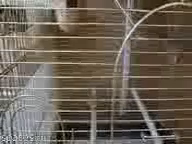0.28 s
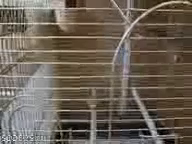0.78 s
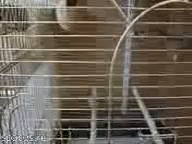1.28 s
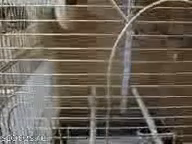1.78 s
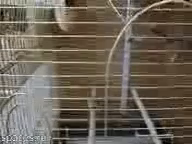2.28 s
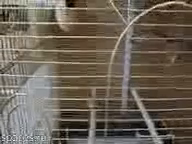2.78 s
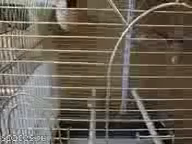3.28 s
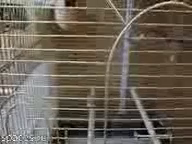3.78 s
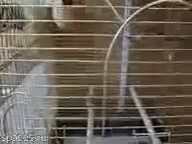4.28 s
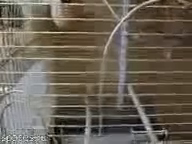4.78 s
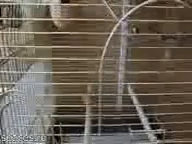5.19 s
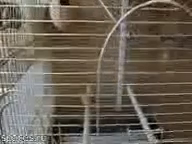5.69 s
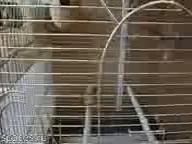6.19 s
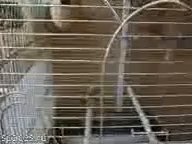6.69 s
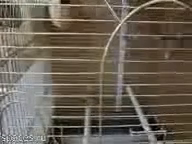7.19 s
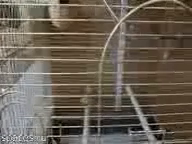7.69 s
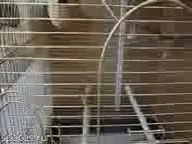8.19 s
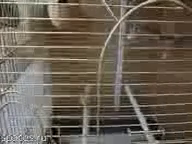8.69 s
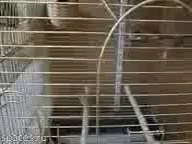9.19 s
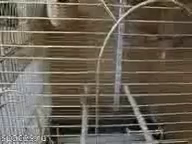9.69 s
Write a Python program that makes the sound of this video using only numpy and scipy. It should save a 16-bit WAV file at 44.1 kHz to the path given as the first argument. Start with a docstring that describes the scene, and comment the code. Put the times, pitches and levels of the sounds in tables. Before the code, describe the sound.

Close, mono, slightly band-limited sound of small cage birds indoors. High peeps with a raspy edge come singly, with little nasal notes and a few hoarse slurs between them. The calls crowd into fast buzzy chatter at the middle, then thin out. Wire rings faintly, feathers rustle and wings thump the air, followed by scattered peeps. A deep unsteady hum and faint air hiss run throughout.

```python
"""In a small room, zebra finches in a wire cage give rising whistles, soft nasal calls and a burst of song.
Each bird has two voices: a sine whistle that glides, and a reed of harmonics mixed with pulsed air.
Shaped noise makes the low hum, drone and room air; a distant engine of two harmonics swells and fades.
A bird flutters from perch to perch: ringing wire, grainy rustle, and puffs of air at the microphone.
"""
import sys
import numpy as np
from scipy import signal
from scipy.fft import rfft, irfft, next_fast_len
from scipy.io import wavfile
from scipy.ndimage import uniform_filter1d, map_coordinates

SR = 44100
rng = np.random.default_rng(int(sys.argv[2]) if len(sys.argv) > 2 else 0)


def generate_wav(sig):
    """Save sig (samples, or channels by samples) to the path in sys.argv[1] as 16-bit PCM at SR."""
    pcm = np.round(np.clip(np.atleast_2d(sig).T, -1, 1) * 32767).astype(np.int16)
    wavfile.write(sys.argv[1], SR, pcm)


N = 437031  # samples in the scene


def amp(db):
    """Decibels to gain."""
    return 10 ** (np.asarray(db) / 20)


def unit(x):
    """Scale to rms 1."""
    return x / np.sqrt(np.mean(x ** 2) + 1e-20)


def along(points, hz):
    """Read (frequency, value) points on a log frequency axis."""
    f, v = np.transpose(points)
    return np.interp(np.log(hz + 1e-9), np.log(f), v)


def curves(rows, t):
    """Each column after the first, read at t."""
    s, *cols = np.transpose(rows)
    return [np.interp(t, s, c) for c in cols]


def clock(length):
    """Sample times over a length in seconds."""
    return np.arange(int(length * SR)) / SR


def wobble(rate, size):
    """A smooth random curve with rate knots a second."""
    knots = rng.standard_normal(int(size * rate / SR) + 4)
    return map_coordinates(knots, [np.arange(size) * rate / SR])


def filtered(x, response):
    """Apply a gain that depends on frequency."""
    m = next_fast_len(2 * len(x))
    gain = response(np.fft.rfftfreq(m, 1 / SR))
    return irfft(rfft(x, m) * gain, m)[:len(x)]


def noise(colour, size, scale=1):
    """Noise of rms 1 with a spectrum, shifted in frequency by scale."""
    white = rng.standard_normal(size)
    return unit(filtered(white, lambda hz: amp(along(colour, hz / scale))))


def cycles(hz):
    """The phase of a moving pitch."""
    return 2 * np.pi * np.cumsum(hz) / SR


def add(track, s, x):
    """Mix x into the track at s seconds."""
    part = track[max(round(s * SR), 0):][:len(x)]
    part += x[:len(part)]


# decay of the small room: [f/Hz, t60/s]
ROOM_DECAY = [(300, 0.23), (2000, 0.3), (4200, 0.25), (7000, 0.2)]


def in_room(x, room_db, bars_db=-11, gap=0.0033):
    """A sound with quick echoes in the cage and a room tail, drawn anew each time; gap in s slows its onset."""
    hz, t, z = signal.stft(rng.standard_normal(SR // 2), SR, nperseg=256)
    decay = amp(-60 * t / along(ROOM_DECAY, hz)[:, None])  # high and low bands die at their own rates
    tail = signal.istft(z * decay, SR, nperseg=256)[1]
    tail *= 1 - np.exp(-np.arange(len(tail)) / SR / gap)
    echo = amp(room_db) * tail / np.linalg.norm(tail)
    delays = rng.uniform(.001, .012, size=6)  # s
    bars = amp(bars_db) * rng.choice([-1, 1], size=6) / np.sqrt(len(delays))
    echo[(delays * SR).astype(int)] += bars
    echo[0] += 1  # the direct sound
    return signal.fftconvolve(x, echo)


def reed(pitch, throat, scale, rough, jitter=0.024):
    """Harmonics of the syrinx through a throat, mixed with air that puffs once a cycle."""
    size, rough = len(pitch), np.clip(rough, 0, 1)
    phase = cycles(pitch * (1 + jitter * rough * wobble(500, size)))
    k = np.arange(1, 15)[:, None]  # harmonic numbers
    partial_hz = k * pitch
    gains = amp(along(throat, partial_hz / scale)) * (partial_hz < SR / 4)
    tone = np.sum(gains * np.sin(k * phase + rng.uniform(0, np.pi, k.shape)), axis=0)
    air = unit(noise(throat, size, np.mean(scale)) * (1 + np.cos(phase)))
    return np.sqrt(1 - rough) * unit(tone) + np.sqrt(rough) * air


def swell(u, rise, fall):
    """The push of air behind a note, rms 1; rise and fall are shares of its length."""
    ramp = np.clip(np.minimum(u / rise, (1 - u) / fall), 0, 1)
    return unit(np.sin(np.pi / 2 * ramp) ** 2)


# low hum filling the room, before hum_db: [t/s, level/dB]
HUM_LEVEL = [(0, -42.5), (0.25, -38.5), (0.85, -46), (1.6, -41.0), (2.25, -36), (2.75, -39.5), (3.4, -37),
             (4.0, -41.5), (4.6, -43), (5.0, -41.5), (5.6, -47), (6.1, -45.9), (6.45, -38.5), (6.85, -38),
             (7.2, -42.5), (8.0, -39), (9.0, -41), (9.9, -43.5)]
# its spectrum: [f/Hz, relative level/dB]
HUM_COLOUR = [(20, -22.5), (30, -12.5), (42, -16.5), (52, -2.5), (60, 3), (67, -3), (76, -12.5),
              (90, -21.5), (110, -32), (150, -53.5), (250, -76)]


def hum(hum_db=0.5, steady=0.38):
    """A wavering low hum: narrow noise whose slow beats are partly evened out."""
    rumble = noise(HUM_COLOUR, N)
    beats = uniform_filter1d(np.abs(signal.hilbert(rumble)), SR // 20)
    rumble = unit(rumble / (beats + .01) ** steady)
    return amp(curves(HUM_LEVEL, np.arange(N) / SR)[0] + hum_db) * rumble


# spectrum of the room air: [f/Hz, relative level/dB]
AIR_COLOUR = [(60, 7), (110, 4.5), (140, 3.5), (200, 0.5), (270, -2), (400, -4.5), (700, -8), (1200, -9.5),
              (2000, -14), (4000, -17), (5500, -18), (6800, -29), (7500, -53.5)]


def room_air(air_db=-54):
    """Nearly even broadband air noise."""
    return amp(air_db + 0.7 * wobble(2.6, N)) * noise(AIR_COLOUR, N)


# upper drone, before gain_db: [t/s, level/dB]
DRONE_LEVEL = [(0, -57), (0.2, -64), (0.45, -53), (1.0, -56.5), (1.8, -55.4), (2.2, -63), (2.85, -58.5),
               (3.6, -60.5), (4.25, -56.5), (4.6, -65.5), (5.4, -59.9), (6.3, -60), (7.3, -59.5),
               (7.95, -60), (8.45, -51.5), (9.2, -55.7), (9.9, -54.5)]
# its spectrum: [f/Hz, relative level/dB]
DRONE_COLOUR = [(90, -48), (140, -17.5), (160, 1.5), (168, 2.5), (180, -6.5), (200, -18.5), (300, -44.5),
                (600, -89.5)]


def drone(gain_db=-1):
    """A narrow band of noise above the hum, wavering in level."""
    return amp(curves(DRONE_LEVEL, np.arange(N) / SR)[0] + gain_db) * noise(DRONE_COLOUR, N)


# distant engine, before its random wander: [t/s, firing f/Hz, level/dB]
ENGINE_RUN = [(.1, 75.46, -60), (.35, 81.5, -46), (.8, 93.3, -54), (1.05, 110.7, -56), (1.25, 125.7, -47),
              (1.5, 138, -50.5), (1.82, 129, -41.8), (1.96, 122.1, -45), (2.16, 116.2, -83)]


def engine(octave_db=-19):
    """A far engine that revs and eases off: its firing tone and the octave above."""
    firing, db = curves(ENGINE_RUN, np.arange(N) / SR)
    phase = cycles(firing * (1 + 0.005 * wobble(13, N)))
    tone = unit(np.sin(phase) + amp(octave_db) * np.sin(2 * phase))
    return amp(db + 2.5 * wobble(5.5, N)) * tone


# resonances over the rasping side of the syrinx, before a slight scaling: [f/Hz, gain/dB]
RASP_THROAT = [(400, -29.5), (850, 2.5), (1100, -2), (1600, -8.5), (2250, -1), (2700, 1), (3300, 11.5),
               (4700, -1.5), (5400, 0), (6400, 1), (7500, -16)]


def chirps(calls, shape, gain_db, rasp_gain_db, room_db, waver, rough, lowest_hz,
           rasp_hz=570, flutter_db=2.0, follow=0.55):
    """One side of the syrinx whistles a gesture floored at lowest_hz before its waver; the other rasps."""
    track = np.zeros(N)
    lead = .3  # a faint lead-in, as a share of the length, before the call proper
    for s, length, hz, db, accent_db, rasp_db in calls:
        u = clock(length * (1 + lead)) / length - lead
        ratio, push_db = curves(shape, u)
        gate = swell((u + lead) / (1 + lead), .2, .06)
        # the whistle frays most towards its end
        fray = waver * (.25 + u ** 2) * wobble(1496, len(u))
        pitch = np.maximum(hz * ratio, lowest_hz) * (1 + fray)
        whistle_db = push_db + accent_db * u + flutter_db * wobble(359, len(u))
        whistle = unit(gate * amp(whistle_db) * np.sin(cycles(pitch)))
        # the rasp follows only part of the whistle's gesture
        reed_voice = reed(rasp_hz * np.sqrt(ratio), RASP_THROAT, 0.99, rough)
        rasp = unit(gate * amp(follow * push_db) * reed_voice)
        call = amp(db + gain_db) * (whistle + amp(rasp_db + rasp_gain_db) * rasp)
        add(track, s - lead * length, in_room(call, room_db))
    return track


# rising contact calls, before gains and gesture:
# [t/s, length/s, f/Hz, level/dB, accent from start to end/dB, rasp re whistle/dB]
CONTACT_CALLS = [(.254, .036, 4030, -26.5, 3, -17.5), (1.0, 0.037, 4073, -26, -3, -14.5),
                 (1.333, 0.037, 3740, -34, 12, -5), (2.029, 0.035, 4095, -21, 1, -17),
                 (3.282, 0.034, 4095, -27.5, -1, -10), (5.052, 0.036, 3950, -26, 8, -17),
                 (5.343, 0.038, 3734, -30.5, 17, -10), (5.481, 0.04, 4060, -26, 4, -12.5),
                 (6.202, 0.039, 4100, -20, -5.5, -16), (6.714, .038, 3650, -28, 8, -9.5),
                 (7.167, 0.04, 3570, -32.5, -4, -9), (7.409, .041, 4040, -24.5, -12, -18.5),
                 (7.505, .037, 3960, -34, -1, -3), (7.56, 0.046, 3490, -33.5, -2.5, -8),
                 (7.829, 0.036, 4006, -29, 2, -13.5), (8.421, 0.039, 3604, -33, -3, -7),
                 (8.892, 0.044, 3675, -34, -3, -10), (9.182, .032, 3903, -36, -9, -6),
                 (9.433, 0.04, 3974, -32.5, 5, -6.5)]
# their shared gesture: [t/share of length, f/ratio, level/dB]
CONTACT_GESTURE = [(-.3, .78, -55), (0, .83, -20.5), (0.251, .937, 1.5), (.35, .98, -5), (.66, 1.005, -4),
                   (.73, 1.15, -8.5), (.86, 1.205, -10), (1, 1.22, -23.5)]


def contact_calls():
    """Short whistles that sweep upwards over a rasp."""
    return chirps(CONTACT_CALLS, CONTACT_GESTURE, gain_db=-2.28, rasp_gain_db=0.5, room_db=-8.0,
                  waver=0.048, rough=0.62, lowest_hz=3250, follow=.58)


# short arched chips, before gains and gesture:
# [t/s, length/s, f/Hz, level/dB, accent from start to end/dB, rasp re whistle/dB]
CHIP_CALLS = [(.581, .023, 3930, -21.5, -1.5, -13.5), (1.67, 0.022, 4010, -15.5, -7.5, -15),
              (2.261, 0.022, 3905, -22.5, -3, -13), (3.754, .023, 3994, -25.5, -4, -10),
              (5.889, 0.027, 4085, -18.5, -4, -10.5)]
# their shared gesture: [t/share of length, f/ratio, level/dB]
CHIP_GESTURE = [(-.3, 0.43, -52.5), (0, .72, -26), (.35, 0.89, -11.5), (.5, 1.07, 1), (.61, 1.13, -9),
                (.86, 1.17, -3), (1, 0.85, -7.5)]


def chips():
    """Short whistles that arch up and drop, over a mostly airy rasp."""
    return chirps(CHIP_CALLS, CHIP_GESTURE, gain_db=-4.5, rasp_gain_db=0.5, room_db=-7,
                  waver=0.041, rough=0.88, lowest_hz=2916)


# falling nasal notes, starting pitch, level before gain_db, hoarseness before it is scaled for the reed:
# [t/s, length/s, f/Hz, level/dB, roughness/0-1]
NASAL_NOTES = [(0.982, 0.049, 771, -42, 0.22), (1.399, 0.042, 763, -38.5, 0.2),
               (1.972, .036, 749, -42.5, 0.03), (2.351, 0.043, 767, -38, 0.19),
               (2.637, 0.046, 754, -42, 0.12), (2.873, 0.045, 772, -38.5, 0.21),
               (3.819, 0.042, 765, -38.5, .17), (4.053, 0.044, 769, -38.5, 0.22),
               (4.161, 0.044, 769, -38.5, 0.13), (4.274, 0.047, 764, -38.5, 0.16),
               (4.819, 0.045, 761, -37.5, 0.08), (5.213, 0.049, 740, -42.5, .35),
               (5.327, .041, 709, -40, .45), (5.511, 0.037, 760, -39.5, 0.52),
               (5.605, 0.032, 963, -31, .05), (5.631, 0.033, 888, -39, 0.47),
               (5.758, 0.035, 761, -40, 0.68), (5.856, 0.03, 960, -31, 0.09)]
# the throat around its moving resonance: [f/ratio to resonance, gain/dB]
NASAL_THROAT = [(.12, -30.5), (.2, -15), (.42, -4), (.6, -8.5), (0.799, -6), (1.01, 5), (1.22, -9),
                (1.45, -16), (1.9, -36.5)]
# share of pitch lost by a note's end, per second of its length; extra at full roughness
SAG_PER_S, HOARSE_SAG_PER_S = 1.53, 5.2
# the throat resonance starts near the fifth harmonic; its closing time
THROAT_RATIO, THROAT_CLOSE_S = 5.07, 0.076


def notes(gain_db=-2.0, room_db=-7):
    """Nasal notes: the pitch sags, more in long and hoarse ones, while the throat closes."""
    track = np.zeros(N)
    for s, length, hz, db, rough in NASAL_NOTES:
        t = clock(length)
        u = t / length
        fall = (SAG_PER_S + HOARSE_SAG_PER_S * rough) * length
        throat_hz = THROAT_RATIO * hz * np.exp(-(t / THROAT_CLOSE_S) ** 2)
        voice = reed(hz * (1 - fall * u ** 1.385), NASAL_THROAT, throat_hz, rough * 0.29)
        add(track, s, in_room(amp(db + gain_db) * swell(u, 0.49, 0.065) * voice, room_db))
    return track


# slurred calls, short and long, one table each, before waver, flutter and gain_db:
# [t/s, f/Hz, level/dB, overtones/dB]
SLURRED_CALLS = [
    [(1.828, 1400, -55.5, -6), (1.858, 1505, -46.5, -6), (1.878, 1677, -42, -27), (1.886, 2220, -41.5, -19),
     (1.896, 2286, -49, -18.5)],
    [(1.978, 2660, -56, -24), (1.987, 2585, -29, -25), (2.004, 2540, -26, -27), (2.013, 2192, -31, -30),
     (2.03, 2293, -40, -27), (2.04, 2353, -50, -27)],
    [(3.256, 1442, -64, 10), (3.274, 1465, -41, 5), (3.305, 1530, -42.5, 3), (3.313, 1605, -34, -9),
     (3.335, 1770, -30, -2.5), (3.368, 1930, -26, -7.5), (3.386, 2055, -24, -7), (3.39, 2980, -28, -21),
     (3.4, 2980, -28, 1.5), (3.414, 2850, -43, -7)],
    [(3.481, 1900, -55, -16.5), (3.486, 1670, -36.5, -16), (3.494, 1630, -54, -6)],
]
# gain over their overtones: [f/Hz, gain/dB]
SLUR_THROAT = [(2800, 5.5), (3400, -20), (4000, 2.5), (4600, -4.5), (5300, -1.5), (6100, -6), (6700, -24),
               (8000, -19.5)]
# resonances of the beak, colouring slur breath and, once scaled, the buzzes: [f/Hz, gain/dB]
BEAK_COLOUR = [(500, -15), (1100, -8.5), (1600, -12), (2200, -1), (3200, 3.5), (3800, 4.5), (4800, 2),
               (5600, -7), (7000, -31)]


def slurs(gain_db=-1.0, room_db=-4, waver=0.021, flutter_db=1.8, breath_db=-12.5):
    """Hoarse slurred calls, short and long: a gliding tone, overtones and breath; some leap in pitch."""
    track = np.zeros(N)
    for rows in SLURRED_CALLS:
        start = rows[0][0]
        pitch, db, over_db = curves(rows, start + clock(rows[-1][0] - start))
        size = len(pitch)
        # fast jitter smears the overtones more than the fundamental
        phase = cycles(pitch * (1 + waver * wobble(1200, size)))
        overtones = sum(amp(along(SLUR_THROAT, k * pitch)) * np.sin(k * phase) for k in range(2, 5))
        tone = np.sqrt(2) * (np.sin(phase) + amp(over_db) * overtones)
        breath = amp(breath_db + over_db / 2) * noise(BEAK_COLOUR, size)
        level = amp(db + gain_db + flutter_db * wobble(201.7, size))
        add(track, start, in_room(level * (tone + breath), room_db))
    return track


# open-beaked buzzes, starting pitch, level before gain_db:
# [t/s, length/s, f/Hz, level/dB, roughness/0-1]
BUZZ_SYLLABLES = [(4.339, 0.025, 546, -42.5, 0.16), (4.376, 0.044, 560, -35.5, 0.28),
                  (4.454, 0.038, 563, -34, 0.44), (4.877, 0.029, 556, -42.5, 0.21),
                  (4.922, 0.042, 557, -33.5, 0.26), (4.998, .036, 560, -32.5, 0.46),
                  (5.083, 0.021, 564, -35.5, 0.51), (5.322, 0.019, 652, -35, .5),
                  (5.381, 0.052, 594, -42.5, 0.7), (5.515, 0.036, 742, -40, 0.4),
                  (5.653, .029, 572, -34, .33), (5.747, 0.047, 737, -44, 1)]
BUZZ_FALL, HOARSE_FALL = .04, .14  # share of its pitch that a buzz loses; extra at full roughness
# scale of the beak's resonances: when clean, rise with roughness, limit
BEAK_NARROW, BEAK_OPENS, BEAK_WIDE = 0.78, 0.83, 1.21


def buzzes(gain_db=-3.0, room_db=-6):
    """Low buzzy syllables: the hoarser, the wider the beak (to a limit) and the further the pitch falls."""
    track = np.zeros(N)
    for s, length, hz, db, rough in BUZZ_SYLLABLES:
        u = clock(length) / length
        beak = min(BEAK_NARROW + BEAK_OPENS * rough, BEAK_WIDE)
        pitch = hz * (1 - (BUZZ_FALL + HOARSE_FALL * rough) * u)
        voice = reed(pitch, BEAK_COLOUR, beak, rough)
        add(track, s, in_room(amp(db + gain_db) * swell(u, 0.61, 0.21) * voice, room_db))
    return track


# steep downstrokes of the song, before gains and gesture:
# [t/s, length/s, f/Hz, level/dB, accent from start to end/dB, rasp re whistle/dB]
SONG_STROKES = [(4.555, 0.012, 4950, -32.5, -1, -10), (5.146, .017, 4750, -28, -7, -15),
                (5.201, .02, 4620, -27, -8, -15.5), (5.273, .015, 5750, -29, 3, -7.5),
                (5.556, .013, 5750, -27, 11, -9), (5.735, .022, 5470, -34.5, -2, -5),
                (5.806, 0.019, 5900, -32.5, 5, -4.5)]
# their shared gesture: [t/share of length, f/ratio, level/dB]
STROKE_GESTURE = [(0, 1.09, -24.5), (0.151, 1.04, -6), (0.578, .95, 8), (0.689, 0.548, -2), (.83, .49, -3),
                  (1.001, .45, -30)]


def strokes():
    """Song whistles that plunge about an octave, with a strong waver."""
    return chirps(SONG_STROKES, STROKE_GESTURE, gain_db=-4.0, rasp_gain_db=-3, room_db=-6,
                  waver=.15, rough=0.84, lowest_hz=2340, flutter_db=1.5)


# feet taking off from the wire and landing on it, level before ring and scratch: [t/s, level/dB]
FOOTFALLS = [(6.62, -53.5), (6.862, -54)]
# ringing modes of the wire, level before a random offset: [f/Hz, level/dB, t60/s]
WIRE_MODES = [(3600, -8, .3), (4990, -1.5, 0.43), (5200, -9, .35), (6440, -6, 0.27), (6880, -12, 0.14)]


def perch(scratch_db=1.0, scratch_t60=.08):
    """Claws scratch the cage wire, which rings faintly in decaying modes."""
    track, t = np.zeros(N), clock(.5)
    for s, db in FOOTFALLS:
        ring = sum(amp(level + rng.normal(0, 2) - 60 * t / t60) * np.sin(2 * np.pi * hz * t)
                   for hz, level, t60 in WIRE_MODES)
        scratch = amp(scratch_db - 60 * t / scratch_t60) * rng.standard_normal(len(t))
        onset = 1 - np.exp(-t / 0.0024)
        add(track, s, in_room(amp(db) * onset * (ring + scratch), room_db=-4.0))
    return track


# bouts of rustling as a bird moves about: [t/s, held/s, level/dB]
RUSTLE_BOUTS = [(6.68, 0.22, -50), (7.35, 0.28, -64), (8.0, 0.09, -59), (8.93, 0.1, -53),
                (9.3, 0.12, -56.5), (9.56, 0.046, -48)]
# spectrum of the rustle: [f/Hz, relative level/dB]
RUSTLE_COLOUR = [(100, 10), (250, 1), (600, 4.5), (1100, 2), (1800, -2), (3000, -3.5), (5200, -4.5),
                 (6800, -15.5), (7500, -35)]
RUSTLE_RISE_S, RUSTLE_T60 = 0.064, 1.47  # s; every bout swells and dies away alike
# puffs of air from beating wings: [t/s, level/dB, t60/s]
WING_PUFFS = [(6.682, -32, 0.094), (6.715, -35, 0.22), (6.757, -29, 0.084), (6.773, -26.5, 0.094),
              (6.803, -30.5, 0.19), (6.862, -34, 0.11), (9.44, -29.5, 0.2), (9.468, -44, 0.13)]
# spectrum of the puffs: [f/Hz, relative level/dB]
PUFF_COLOUR = [(20, 4.5), (45, -5.5), (90, -3.5), (170, -4.5), (300, -15.5), (700, -24.5), (1500, -61),
               (4000, -43)]


def wings(grain_db=2.0):
    """Wingbeats push dull puffs of air at the microphone, over bouts of grainy rustle."""
    t = np.arange(N) / SR
    stir = np.zeros(N)
    for s, hold, db in RUSTLE_BOUTS:
        rise = np.exp(-(np.minimum(t - s, 0) / RUSTLE_RISE_S) ** 2)
        stir += amp(db - 60 * np.maximum(t - s - hold, 0) / RUSTLE_T60) * rise
    track = stir * unit(noise(RUSTLE_COLOUR, N) * amp(grain_db * wobble(120, N)))
    t = clock(0.13)
    for s, db, t60 in WING_PUFFS:
        envelope = amp(db - 60 * t / t60) * (1 - np.exp(-t / 0.0053))
        add(track, s, envelope * noise(PUFF_COLOUR, len(t)))
    return track


def scene():
    """All the birds over the sounds of the room, on one channel."""
    room = hum() + room_air() + drone() + engine()
    birds = contact_calls() + chips() + notes() + slurs() + buzzes() + strokes()
    return (room + birds + perch() + wings())[None]


TOP_HZ = 7150  # band limit


def record(dry):
    """The microphone's recorder cuts steeply above its band limit."""
    return np.array([filtered(x, lambda hz: 1 / np.sqrt(1 + (hz / TOP_HZ) ** 120)) for x in dry])


dry = scene()
out = record(dry)
generate_wav(out)
```